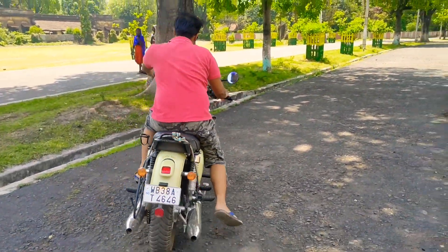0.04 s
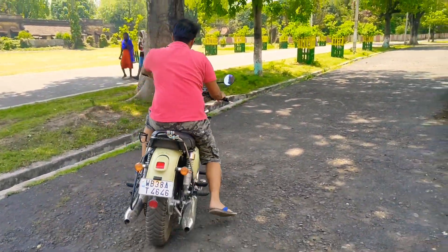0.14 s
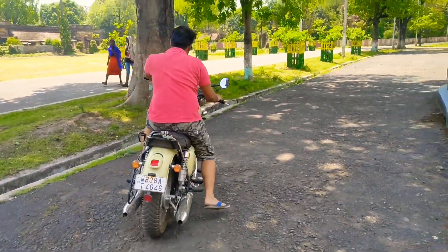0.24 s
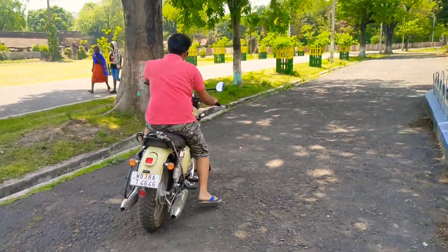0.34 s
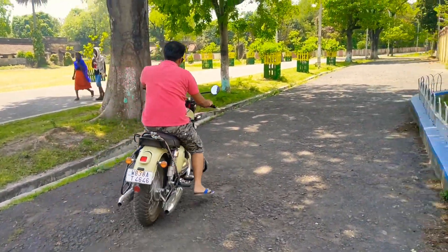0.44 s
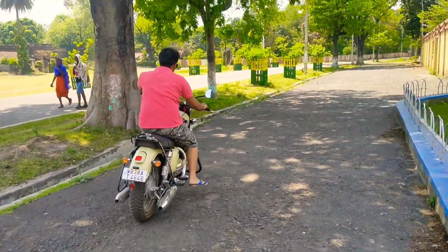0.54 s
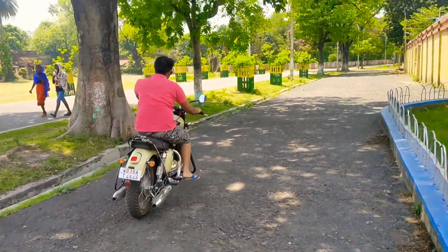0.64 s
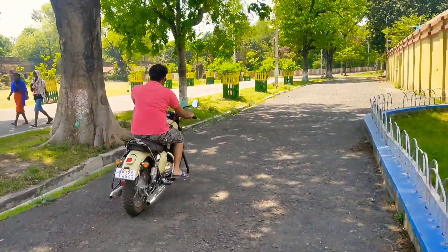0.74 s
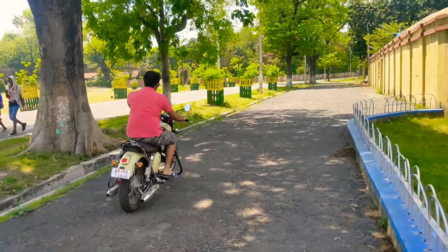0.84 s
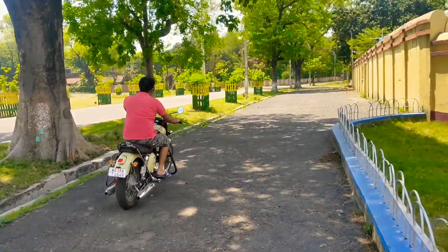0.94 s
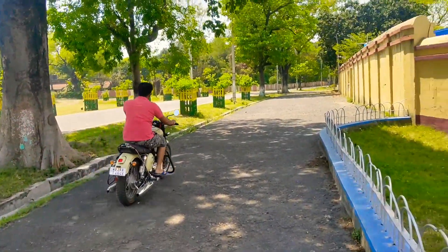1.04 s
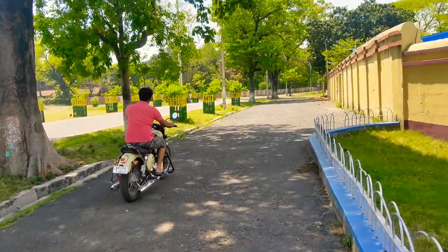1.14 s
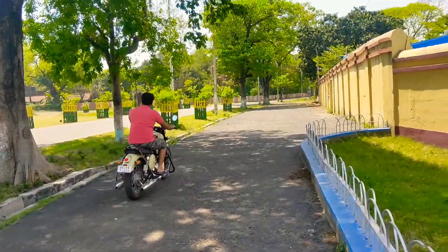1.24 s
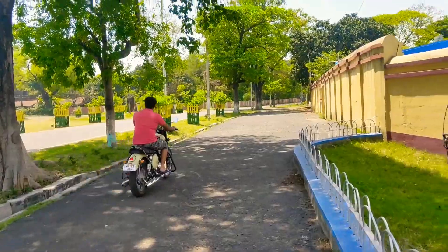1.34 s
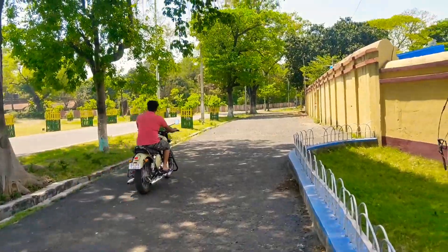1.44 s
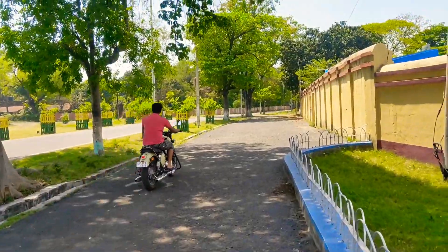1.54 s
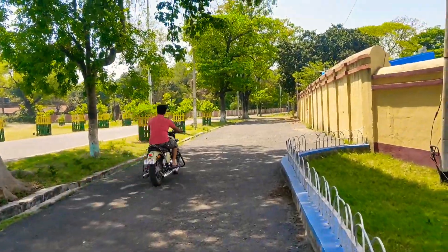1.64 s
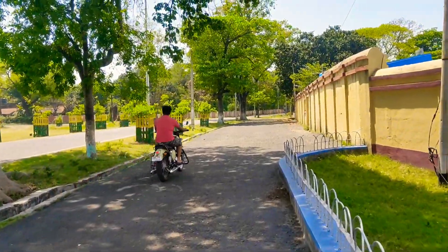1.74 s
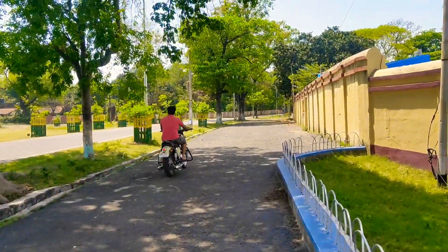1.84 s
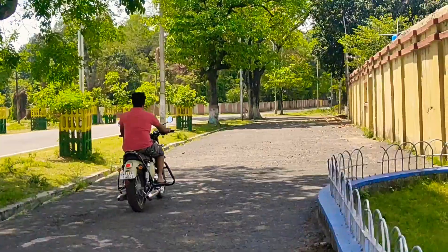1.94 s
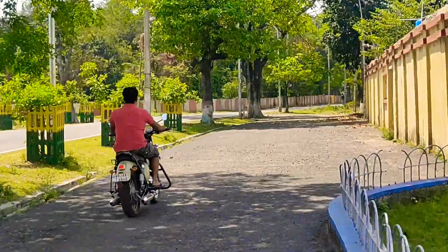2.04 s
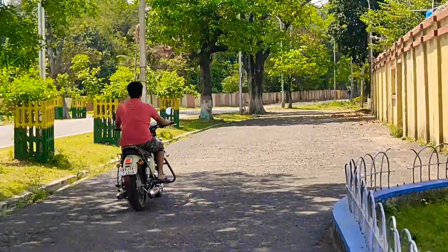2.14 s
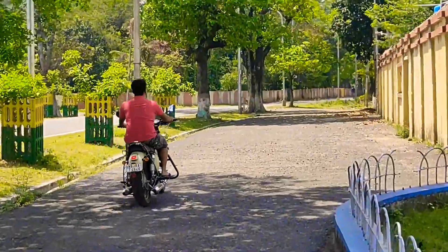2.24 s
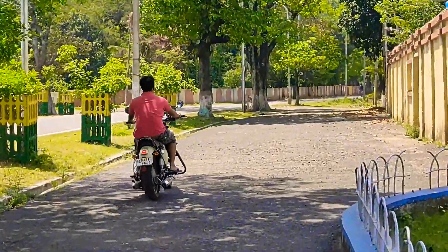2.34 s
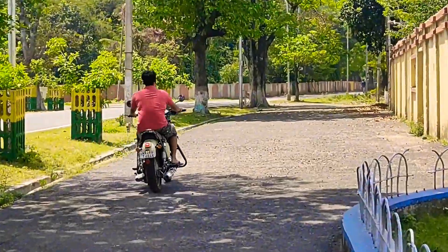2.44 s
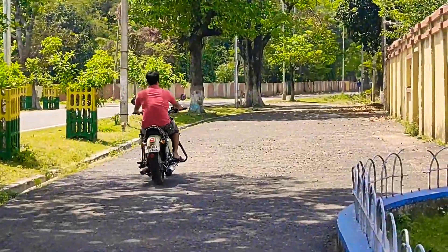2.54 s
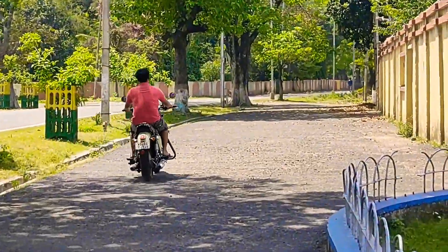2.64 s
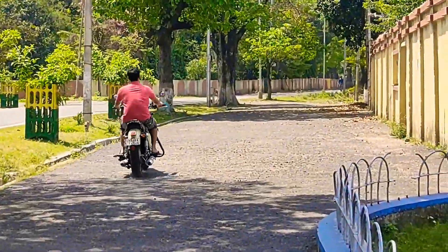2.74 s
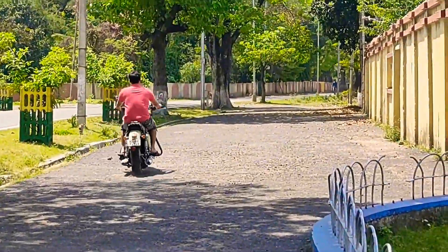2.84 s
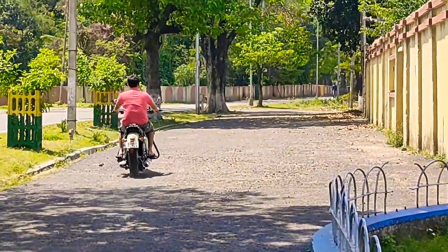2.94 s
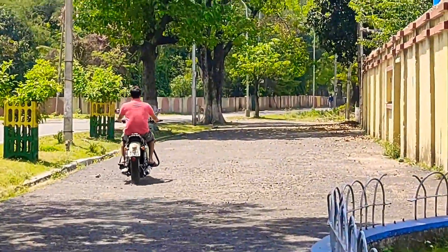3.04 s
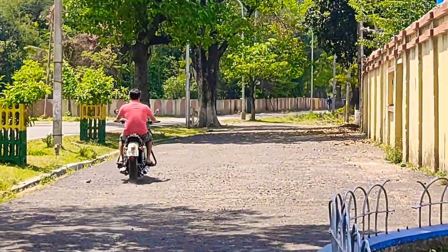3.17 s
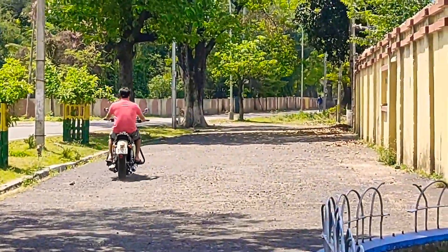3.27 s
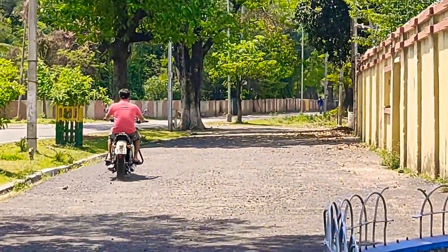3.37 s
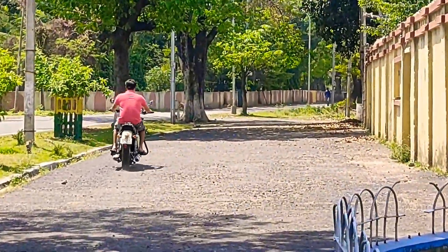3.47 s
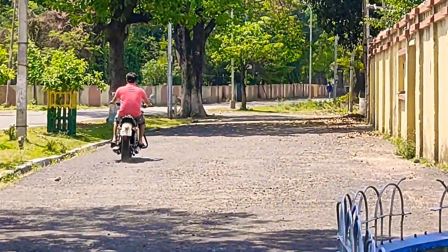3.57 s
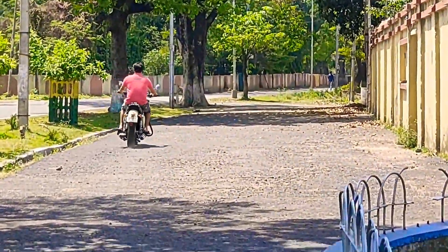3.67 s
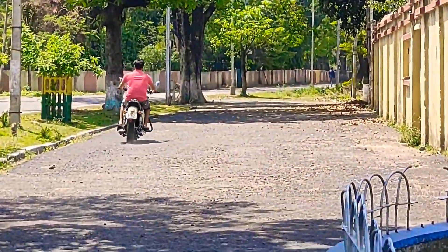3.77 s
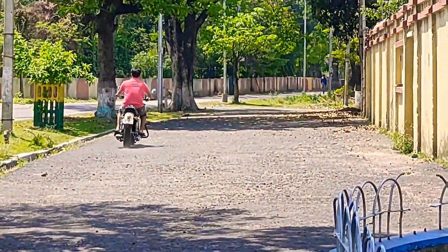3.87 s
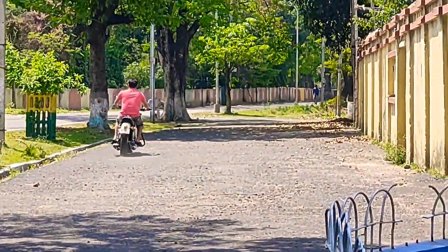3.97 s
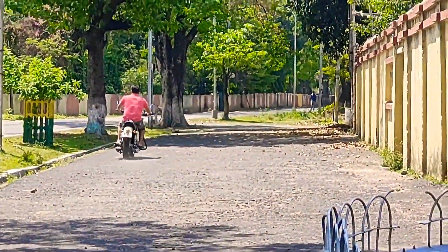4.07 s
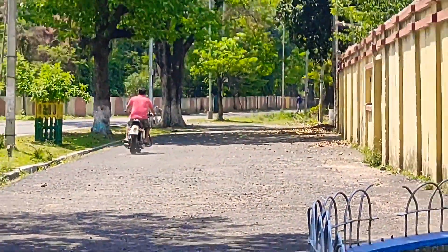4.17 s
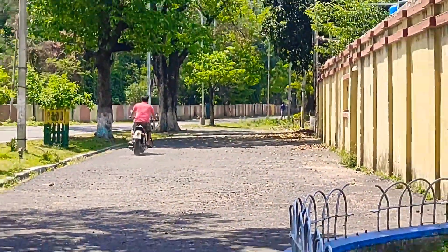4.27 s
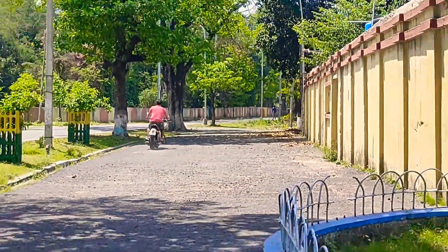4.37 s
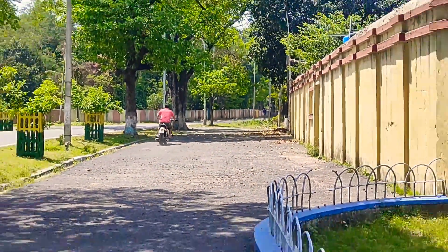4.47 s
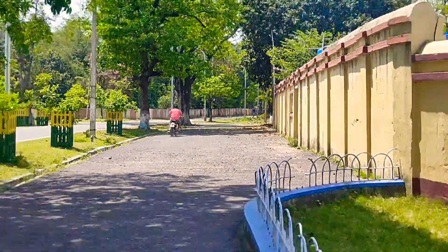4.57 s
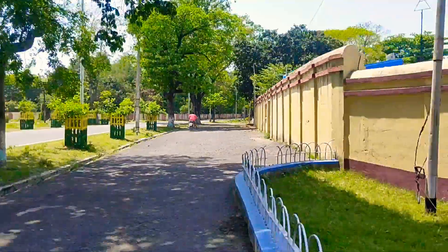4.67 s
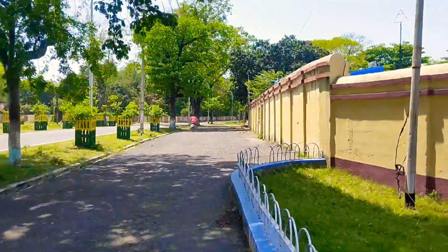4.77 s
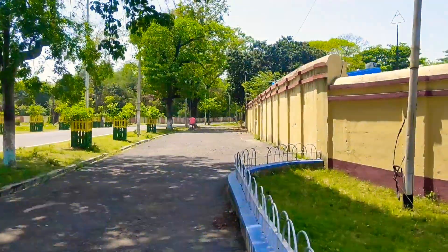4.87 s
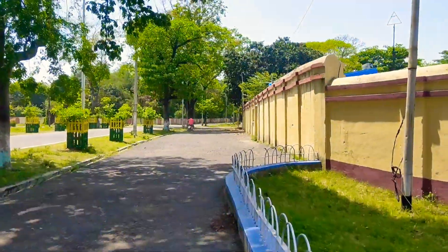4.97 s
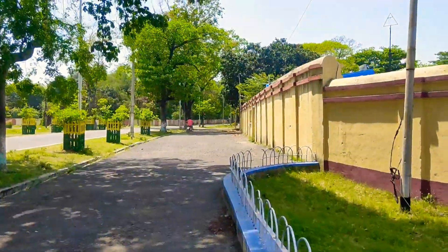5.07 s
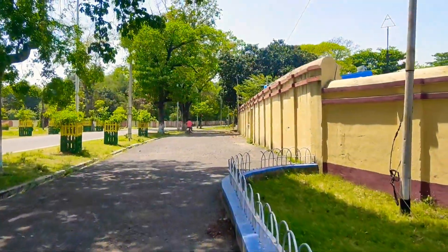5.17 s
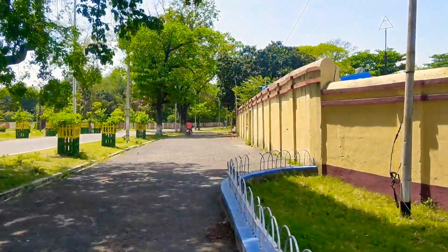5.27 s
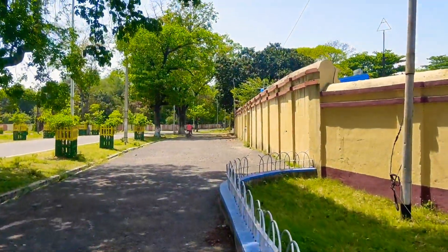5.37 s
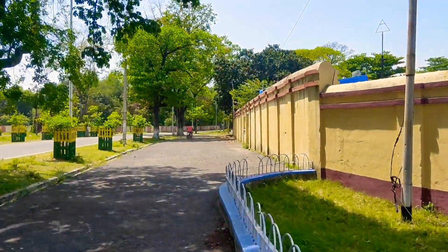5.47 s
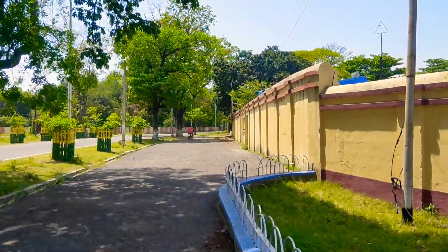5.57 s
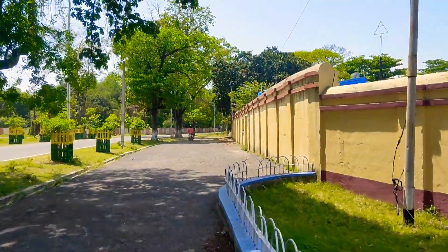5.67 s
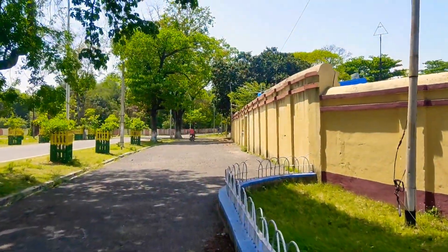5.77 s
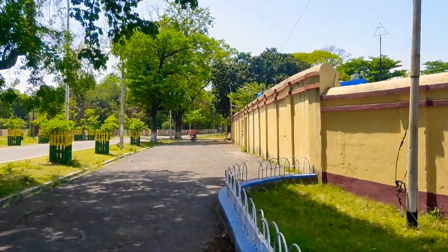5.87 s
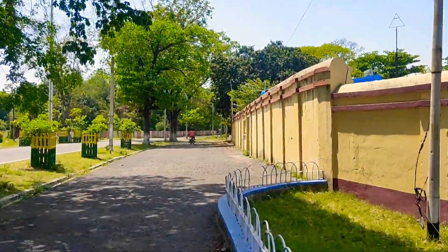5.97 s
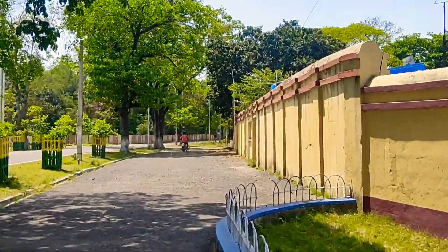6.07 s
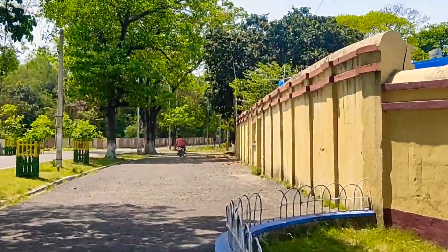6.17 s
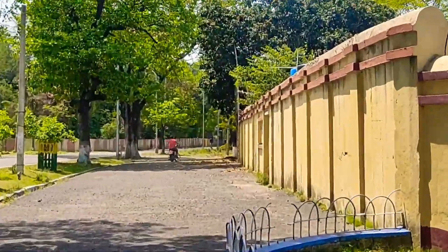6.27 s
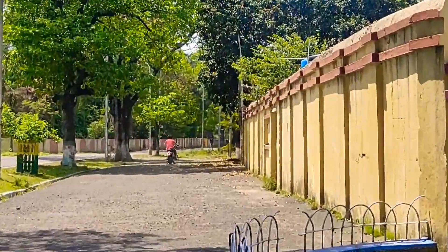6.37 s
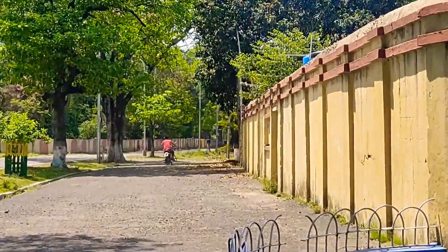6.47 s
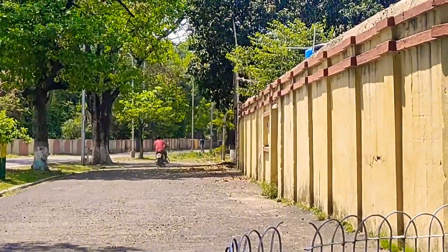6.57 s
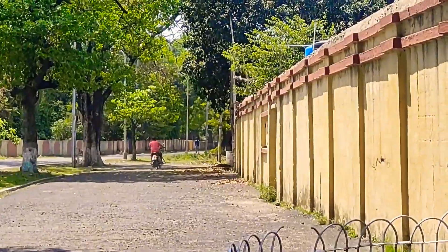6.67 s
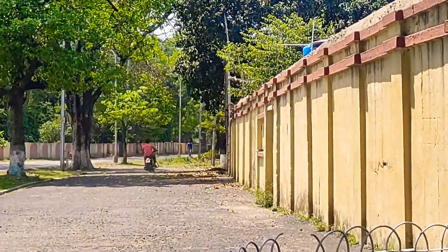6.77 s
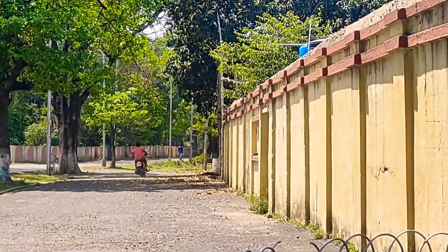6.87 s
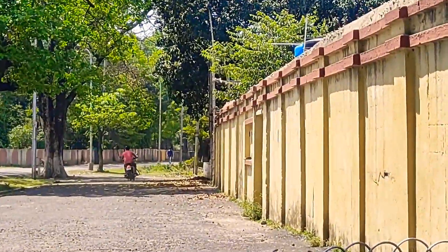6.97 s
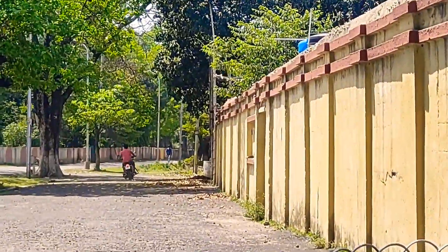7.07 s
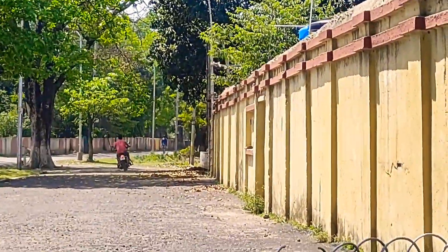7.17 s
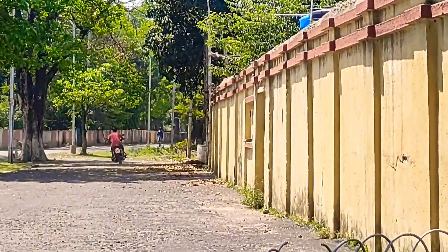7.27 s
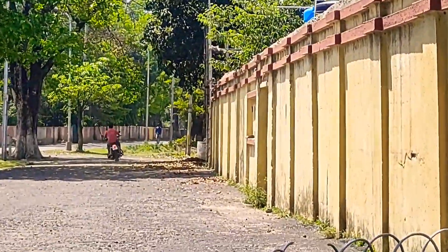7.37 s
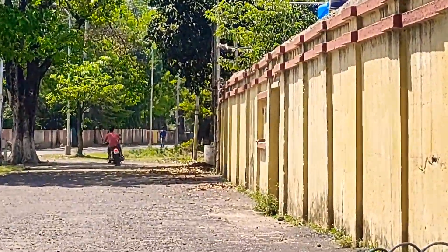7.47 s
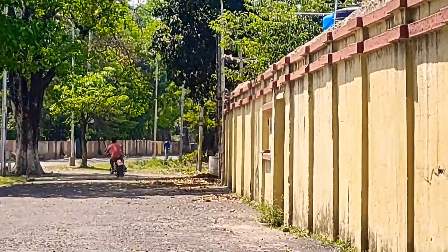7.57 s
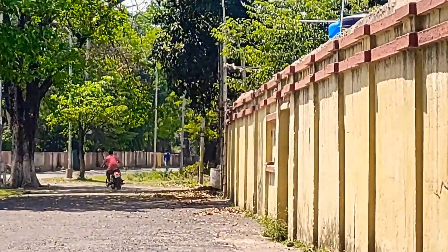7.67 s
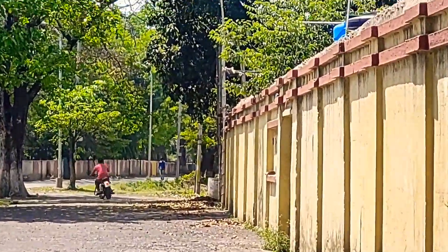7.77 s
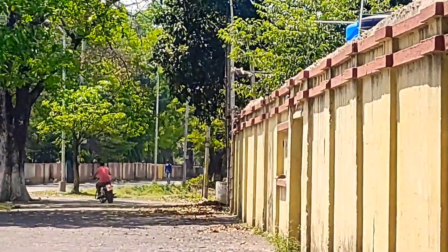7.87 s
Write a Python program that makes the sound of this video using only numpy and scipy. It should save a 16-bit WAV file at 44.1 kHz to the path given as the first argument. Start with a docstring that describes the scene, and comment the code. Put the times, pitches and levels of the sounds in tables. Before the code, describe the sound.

A single-cylinder motorcycle pulls away with loud thumping exhaust, changes gear twice, fades down a walled lane; rustling and snaps close on the left.

```python
"""Motorcycle leaving down a walled lane

A single-cylinder motorcycle pulls away, changes gear twice and coasts off with uneven pops. Each firing rings
the exhaust pipes, returns off a wall and puffs hiss; the engine clatters. Wind stirs the two microphone ports,
something rustles and ticks close on the left, a thin high chirp sounds about once a second, far noise is faint."""
import sys
import numpy as np
from scipy import signal
from scipy.fft import rfft, irfft, next_fast_len
from scipy.io import wavfile
from scipy.ndimage import uniform_filter1d, map_coordinates

SR = 44100
rng = np.random.default_rng(int(sys.argv[2]) if len(sys.argv) > 2 else 0)


def to_wav(s):
    """Save 16-bit WAV."""
    ch = np.atleast_2d(s).T  # columns
    pcm = np.round(np.clip(ch, -1, 1) * 32767)  # PCM
    wavfile.write(sys.argv[1], SR, pcm.astype(np.int16))


def level_to_linear(level):
    """Convert decibel levels to linear amplitude factors, elementwise."""
    exponent = np.asarray(level, float) / 20
    return 10 ** exponent


N = 349097

# Noise colours, scaled to rms 1 in use. Each row: frequency in Hz, relative density in dB per Hz.
FAR_COLOUR = [(880, -38), (1000, 1), (1130, -4), (1280, -14), (1420, -43)]
WIND_COLOUR = [(15, -14), (30, -3), (55, -1), (90, -1), (125, -8), (170, -30), (250, -90)]
RUSTLE_COLOUR = [(880, -48), (1600, -19), (1900, -2), (2250, -2), (2600, 3.5), (3040, 3.5), (4240, -14),
                 (5820, 1.5), (10900, -31.5), (12100, -52.5), (13000, -31)]
RUMBLE_COLOUR = [(40, -54), (80, -33), (120, 9), (180, 8), (260, 3.5), (320, 8.5), (450, -51), (700, -80)]
DRONE_COLOUR = [(250, -49), (350, -7.5), (450, -6), (540, -1), (640, -5), (750, -7.5), (950, -19),
                (1200, -70)]
SHELL_COLOUR = [(600, -18), (700, -2.5), (785, 4), (850, -4.5), (930, -71)]
CLATTER_COLOUR = [(530, -36), (900, 1.5), (1130, -3.5), (1280, -7), (1350, 4.5), (1560, -0.5), (1710, 3),
                  (1940, -4), (2490, 2.5), (2700, -3.5), (3000, -3.5), (3280, -5.5), (3640, -13),
                  (4000, -11.5), (5200, -11.5), (8800, -120)]
HISS_COLOUR = [(2060, -24), (3500, -10.5), (3920, -4), (4660, -2.5), (5990, 6.5), (6700, -0.5),
               (8030, -17.5), (11000, -20.5), (12600, -28), (14900, -3.5), (15600, -42)]
CHIRP_COLOUR = [(11400, -52), (11800, 8), (12400, 5), (12800, -37)]
SNAP_TOP_COLOUR = [(7000, -36), (9000, 9), (15500, -11)]
TAPS_COLOUR = [(600, -49), (1000, 3.0), (3600, -0.5), (5500, -40), (8000, -95)]
# Filters that colour the ticks. Each row: frequency in Hz, gain in dB.
TICK_COLOUR = [(1300, -42.0), (1900, 4.0), (2500, 2), (3500, 1.5), (4500, -15), (7000, -5.5), (9000, -18),
               (11000, -48)]
TICK_TOP_COLOUR = [(7000, -40), (9000, 4), (15500, 8)]

# Wind at the ports, before its lumps. Each row: time in seconds, level in dB.
WIND = [(0, -54), (.6, -43), (.8, -28), (1, -31.5), (1.2, -42), (1.54, -28), (1.75, -40), (2.03, -24),
        (2.2, -34), (2.35, -25.5), (2.6, -34), (2.95, -23.5), (3.22, -35.5), (3.44, -29), (3.85, -38),
        (4.5, -47), (4.72, -34), (5, -36), (5.24, -35.5), (5.45, -36.5), (5.9, -38.5), (6.2, -33.5),
        (6.55, -45), (6.85, -35), (7.12, -40), (7.4, -41.5), (7.92, -54)]
# High chirps. Each row: start in seconds, time to fall 26 dB in seconds, level in dB before flutter and panning.
CHIRPS = [(3.665, 0.081, -58), (4.66, 0.097, -51), (5.64, 0.33, -58.5), (6.63, 0.12, -55),
          (7.657, 0.16, -60)]
# Dry ticks nearby. Each row: start in seconds, relative level in dB, left over right in dB,
# relative level of the top octave in dB.
TICKS = [(4.958, -36, 10, -13), (5.23, -34, 12, -34), (5.3553, -23.5, 12, -30), (5.372, -31, 14, -26)]
# Snaps in the rustle. Each row: start in seconds, relative level in dB, 60 dB decay time in seconds,
# opening crack over the snap in dB, lower band over the upper in dB.
SNAPS = [(6.1882, -35, 0.11, 2, -5), (6.214, -31, 0.17, 4, -1), (6.48, -44, 0.11, -2, -2),
         (6.6162, -34, 0.19, 13, -14), (6.652, -36, 0.093, 12, -1), (6.674, -38.5, 0.087, 19, -2),
         (6.687, -47, .04, 4, 5), (6.7895, -54, 0.044, 8, -12), (6.8631, -47, 0.11, -2, 6),
         (7.0248, -60, 0.043, -2, -8), (7.0484, -33.5, 0.05, 7, -1.5), (7.0936, -44, 0.094, 8, -8),
         (7.118, -41, 0.1, 10, 5.5), (7.2263, -49, .08, 2, -11), (7.28, -45, 0.083, -6, 0),
         (7.3136, -37, 0.19, 7, -8), (7.345, -50, .06, 3, 0), (7.41, -36, 0.082, -6, -6),
         (7.4777, -39, 0.089, -2, -4), (7.488, -45, 0.099, 6, 2), (7.582, -52, 0.072, 2, -8),
         (7.6085, -37, 0.3, 9, -13), (7.625, -42, 0.17, 0, -6), (7.66, -40, 0.2, -6, -5),
         (7.734, -27.5, 0.091, 4, -5), (7.79, -39, .15, -9, -1), (7.8147, -35, 0.21, -9, -2),
         (7.828, -41, 0.16, -3, -7), (7.842, -46, 0.17, 3, -5)]
# Engine speed as heard. Each row: time in seconds, firings a second.
SPEED = [(0.0, 25.31), (0.415, 23.22), (0.71, 27.3), (1.04, 25.91), (1.455, 28.66), (2.165, 28.95),
         (2.505, 31.69), (3.58, 39.0), (3.835, 39.26), (4.0, 35.83), (4.23, 37.9), (4.98, 34.5),
         (5.05, 34.7), (5.19, 37.8), (5.28, 38.4), (5.38, 34.7), (5.48, 33.7), (5.53, 28.3), (5.61, 30.8),
         (5.73, 32.64), (6.21, 30.89), (6.625, 28.35), (7.0, 22.49)]
# Gear changes, in which firings lose their beat. Each row: start in seconds, length in seconds.
GEARS = [(3.95, .29), (5.09, .38)]
# Scattered rumble, before its lumps. Each row: time in seconds, level in dB.
RUMBLE = [(0, -28), (.5, -33), (1.4, -36), (2.2, -38), (2.7, -34), (3.3, -38), (3.7, -43), (4.1, -42),
          (4.4, -51), (5.1, -48), (5.32, -41), (5.7, -51), (6.4, -55), (6.85, -50), (7.2, -54), (7.5, -53),
          (7.92, -60)]
# Engine noise, before it swells with the firings. Each row: time in seconds, drone in dB,
# silencer shell in dB, clatter in dB.
ENGINE = [(0, -37.5, -30.5, -26.5), (.5, -39, -32.5, -28), (.9, -37, -39.5, -28.5),
          (1.4, -34.5, -45, -30.5), (2.1, -35.5, -38.5, -31), (3.7, -37, -39.5, -33.5),
          (3.95, -44.5, -40.5, -37), (4.7, -44.5, -46.5, -40.5), (5.7, -47.5, -54, -45.5),
          (6.4, -52.5, -47.5, -48.5), (6.7, -58, -51, -51), (7, -60, -60, -55.5), (7.17, -66, -63.5, -55),
          (7.4, -91, -56.5, -62), (7.55, -85, -65, -68), (7.78, -95, -72, -75), (7.82, -91, -57, -55),
          (7.92, -87, -72, -61)]
# Ringing engine cases. Each row: frequency in Hz, width in Hz, relative gain in dB.
CASES = [(1070, 18, -15.5), (1320, 146, 2.5), (1561, 57, 3.5), (1896, 300, 2.5), (2275, 240, -10),
         (2660, 84, 4), (3217, 33, -3)]
# Rasp that climbs as the throttle opens. Each row: time in seconds, centre in Hz, level in dB before swelling.
SURGE = [(.3, 1400, -55), (.55, 1200, -41), (.65, 1250, -36), (.8, 1420, -28.5), (.9, 1530, -32),
         (.95, 1330, -34), (1.1, 1330, -40), (1.25, 1380, -32), (1.45, 1440, -38), (2.1, 1400, -44),
         (2.4, 1520, -35), (2.7, 1500, -53), (3.3, 1540, -42), (3.9, 1540, -50), (4.2, 1500, -73)]
# Level of each pipe mode as the pipes turn away, load changes and distance grows.
# Each row: time in seconds, boom in dB, body in dB, throat in dB, ring in dB.
EXHAUST = [(0, -11.5, -13.5, -35, -19.5), (.84, -24, -18, -21.5, -23.5), (.93, -24, -20, -22.5, -32.5),
           (1.6, -24.5, -27.5, -23, -24.5), (2.2, -32.5, -24, -31, -26.5), (2.6, -57, -34.5, -26.5, -29.5),
           (3.1, -68, -28.5, -36.5, -27), (3.5, -43, -44, -48, -26), (3.93, -52, -55, -80, -29),
           (4.02, -32, -39, -45, -40), (4.3, -46, -40, -52, -34.5), (4.6, -37, -36, -67, -40),
           (5.05, -30, -54, -62, -43.5), (5.15, -60, -46, -64, -41), (5.45, -59, -50, -44, -43),
           (5.55, -34, -60, -74, -48), (6.2, -35, -48, -77, -54), (6.5, -36.5, -40.5, -63, -42.5),
           (6.9, -37.5, -47, -60, -45), (7.3, -49.5, -44.5, -82, -51), (7.92, -50, -55.5, -90, -100)]
# Pipe modes: boom, body, throat and ring. Each row: frequency in Hz, width in Hz.
PIPE = [(113, 34), (156, 38), (205, 49), (260, 44.6)]
# The loud ones of the uneven firings while coasting. Each row: time in seconds, dB over a regular firing.
POPS = [(7.017, -2), (7.107, 9), (7.172, 2), (7.195, -6), (7.233, -5), (7.284, 4.5), (7.498, 0),
        (7.548, 4.5), (7.627, 0), (7.696, 1), (7.732, -1), (7.779, 4), (7.858, 1.5)]
# Weaker tones tied to the firings. Each row: time in seconds, upper pipe mode in dB, overtones in dB,
# low tone at twice the firing rate in dB.
FRINGE = [(0, -37, -55, -30), (.7, -26.5, -46, -27), (1.3, -31, -58, -42), (1.7, -38, -54, -40),
          (2.2, -44, -56, -32), (2.6, -37.5, -53, -45), (3, -35, -47, -46), (3.6, -37, -39.5, -33),
          (3.95, -49.5, -51, -35), (4.4, -40.5, -50, -38), (4.75, -48, -67, -37), (5.1, -51.5, -62, -71),
          (5.5, -61, -49, -52), (6.1, -49.5, -61, -73), (6.9, -90, -71, -59), (7.92, -90, -95, -90)]
# Resonances of the overtones, passed twice. Each row: frequency in Hz, width in Hz, gain of one pass in dB.
OVERTONES = [(407, 43, -2), (565, 120, 0.5), (693, 120, 3)]
# Difference between the ports for the motorcycle. Each row: frequency in Hz, left over right in dB.
PORTS = [(60, 4.5), (110, -0.5), (200, 0.5), (380, 1), (700, 1), (1290, 2), (2380, 5.5), (4400, 2.5),
         (8120, -4), (15000, 5)]
# Delay of the left port behind the right. Each row: frequency in Hz, lag in samples.
LEFT_LAG = [(250, 11), (700, 5), (1300, 8), (1700, 11)]

FAR_DB = -67.5  # before its wobble
RUSTLE_S, RUSTLE_RISE_S, RUSTLE_DB = 5.54, 0.7, -55.5  # start, fade-in, level before grain and panning
SNAP_RISE = 0.02  # attack time constant as a share of the decay time
SNAP_GRAIN_DB, SNAP_LEFT_DB = 3.5, 12  # roughness of the decay; whole rustle, left over right
SNAP_TOP_DB = -48  # added top octave, relative to the snap
CRACK_T60_S, CLICK_DB = .011, -4  # decay of the opening crack; trim of the dry click that starts it
TICK_TAIL_DB, TICK_T60_S = -17.5, 0.025  # a short scratchy tail
FIRST_FIRING_S = .0074
# round the far bend sounds lose their upper part: start, time to complete, corners of the two steps
BEND_S, BEND_SPAN_S, BEND_HZ = 6.45, 1.05, (325, 225)
# close by, the noise comes in puffs with the firings: share at the start 0-1, time in which it halves
PUFFED, PUFF_HALF_S = 0.77, 1.7
STROKE_SCATTER_DB = 1.5  # strength from firing to firing
# bursts in each cycle: cycles ahead of the exhaust beat, rise in cycles, decay in cycles
KNOCK, PUFF = (.2, .06, .09), (.012, .03, .13)
# every firing knocks the silencer shell: mode and width, cycles ahead of the beat, dB over the shell's noise
SHELL_HZ, SHELL_WIDTH_HZ, SHELL_LEAD, SHELL_KNOCK_DB = 790, 70, .13, -3
TAPS_BEAT = .12  # share of the valve taps that falls on the beat, at any distance
SURGE_WIDTH_HZ = 110
HISS_DB, HISS_LOSS_DB_PER_S = -28.5, 5  # level at the start before puffing; the hiss thins with distance
TOP_DB, TOP_S, TOP_LOSS_DB_PER_S2 = 7.5, 2.34, 1  # hiss above 7.5 kHz: largest lift, when, fall to either side
STEADY_MS_PER_S, STUMBLE_MS = .03, .9  # timing scatter: growth with distance, extra while changing gear
FAINT_POPS, FAINT_POP_DB = 8, -7  # weak ones at random while coasting: count, dB over a regular firing
# the sharp edge of each firing wears off: halving time, share that stays 0-1
EDGE_HALF_S, EDGE_LEFT = 0.71, 0.034
RASP_HZ, RASP_WIDTH_HZ = 370.4, 92  # upper pipe mode
# the wall's answer is strongest while the bike runs alongside: middle, time to either side for 30 dB less,
# level under the direct sound
WALL_S, WALL_SPAN_S, WALL_DB = 2.3, 1.36, -10
# its lag shrinks steadily: lag at the middle, rate, least lag
WALL_LAG_MS, WALL_CLOSING_MS_PER_S, WALL_LEAST_MS = 14.8, 16, 4


def unit(x):
    """Scaled to rms 1."""
    return x / np.sqrt(np.mean(x ** 2) + 1e-20)


def along(points, hz):
    """(Hz, value) points read on a log axis."""
    f, v = np.transpose(points)
    return np.interp(np.log(hz + 1), np.log(f + 1), v)


def curves(rows):
    """One value per sample for each column after the time."""
    s, *cols = np.transpose(rows)
    return [np.interp(np.arange(N) / SR, s, c) for c in cols]


def wobble(rate):
    """A smooth random curve, rate knots a second."""
    return map_coordinates(rng.standard_normal(int(N * rate / SR) + 4), [np.arange(N) * rate / SR])


def filtered(x, response):
    """x times a complex response of frequency."""
    m = next_fast_len(N + 8192)
    return irfft(rfft(x, m) * response(np.fft.rfftfreq(m, 1 / SR)), m)[..., :N]


def lower_part(x, corner_hz, order=12):
    """What lies below a corner, without phase shift."""
    return filtered(x, lambda f: 1 / (1 + (f / corner_hz) ** order))


def resonance(f, centre_hz, width_hz):
    """Response of one damped mode, 1 at its centre."""
    return 1j * f * width_hz / (centre_hz ** 2 - f * f + 1j * f * width_hz)


def resonances(f, modes):
    """Several damped modes side by side, each with its gain."""
    return sum(level_to_linear(db) * resonance(f, centre_hz, width_hz) for centre_hz, width_hz, db in modes)


def rush(colour, alike, patchy_db=0):
    """Stereo noise of rms 1; alike is the share of power common to both ports; narrow, brief patches stand out."""
    common, *own = rng.standard_normal((3, N))
    pair = np.sqrt(alike) * common + np.sqrt(1 - alike) * np.array(own)
    if patchy_db:
        z = signal.stft(pair, nperseg=512)[2]
        field = uniform_filter1d(rng.standard_normal(z.shape[1:]), size=3, axis=0)
        field = uniform_filter1d(field, size=6, axis=1)
        pair = signal.istft(z * level_to_linear(patchy_db * unit(field)), nperseg=512)[1][:, :N]
    return unit(filtered(pair, lambda hz: level_to_linear(along(colour, hz))))


def distance():
    """A faint, patchy band of far-off noise."""
    return level_to_linear(FAR_DB + 3.8 * wobble(6.9)) * rush(FAR_COLOUR, 0.33, patchy_db=4)


def wind():
    """Lumpy low buffeting at the microphone, partly different at each port."""
    return level_to_linear(curves(WIND)[0] + 3.2 * wobble(12) + 4.1 * wobble(22)) * rush(WIND_COLOUR, 0.17)


def chirps():
    """A thin fluttering noise band near the top of hearing; each chirp starts at once and dies away."""
    t = np.arange(N) / SR
    level = sum(level_to_linear(db) * (t > s) * np.exp(-3 * np.clip(t - s, 0, 9) / length) for s, length, db in CHIRPS)
    flutter = level_to_linear(4 * wobble(70))
    return level * flutter * rush(CHIRP_COLOUR, 0.41) * level_to_linear([[3], [-6]])


def ticks():
    """Single sharp, broad clicks close on the left: a filtered impulse with a scratchy noise tail."""
    body, bright = np.zeros((2, 2, N))
    t = np.arange(SR // 30) / SR
    for s, db, pan_db, bright_db in TICKS:
        start = round(s * SR)
        sides = level_to_linear(db + np.array([pan_db / 3, -pan_db * 2 / 3]))
        tail = level_to_linear(TICK_TAIL_DB - 60 * t / TICK_T60_S) * rng.standard_normal((2, len(t)))
        tail[:, 0] = 1  # the impulse itself
        body[:, start:start + len(t)] += level_to_linear(18.0) * sides[:, None] * tail
        bright[:, start] = level_to_linear(bright_db + 22) * sides
    body = filtered(body, lambda hz: level_to_linear(along(TICK_COLOUR, hz)))
    return body + filtered(bright, lambda hz: level_to_linear(along(TICK_TOP_COLOUR, hz)))


def rustle():
    """Grainy scuffing with sharp snaps, close to the left port; each snap opens with a crack and crumbles away."""
    begun = np.clip((np.arange(N) / SR - RUSTLE_S) / RUSTLE_RISE_S, 0, 1)
    grain = level_to_linear(3 * wobble(40) + 2.5 * wobble(250))
    level = begun * grain * level_to_linear(RUSTLE_DB) * level_to_linear([[0], [-2]])  # upper band, lower band
    bright, clicks = np.zeros((2, N))
    crumble = level_to_linear(SNAP_GRAIN_DB * wobble(300))
    t = np.arange(SR // 3) / SR
    for s, db, t60, crack_db, lower_db in SNAPS:
        start = round(s * SR)
        burst = level_to_linear(-60 * t / t60) * (1 - np.exp(-t / (SNAP_RISE * t60))) * crumble[:len(t)]
        crack = level_to_linear(crack_db - 60 * t / CRACK_T60_S) * (1 - np.exp(-t * 3000))
        burst = level_to_linear(db - 9.0) * (burst + crack)
        level[:, start:start + len(t)] += (burst * level_to_linear([[0], [lower_db]]))[:, :N - start]
        bright[start:start + len(t)] += level_to_linear(SNAP_TOP_DB) * burst[:N - start]
        clicks[start + 20] = level_to_linear(db - 14.0 + crack_db + CLICK_DB)
        crumble = np.roll(crumble, len(t))  # another stretch for the next snap
    scuff = rush(RUSTLE_COLOUR, 0.049, patchy_db=1)
    lower = lower_part(scuff, 4200)
    both = level[0] * (scuff - lower) + level[1] * lower + bright * rush(SNAP_TOP_COLOUR, .3)
    colour = lambda hz: level_to_linear(along(RUSTLE_COLOUR, hz))
    both += filtered(clicks, colour) / np.mean(colour(np.linspace(0, SR / 2))) * 2
    return both * level_to_linear([[SNAP_LEFT_DB / 3], [-SNAP_LEFT_DB * 2 / 3]])


def crank():
    """Firing cycles counted since the first one: the running sum of the engine speed."""
    cycles = np.cumsum(curves(SPEED)[0]) / SR
    return cycles - cycles[round(FIRST_FIRING_S * SR)]


def receding(x):
    """x fading over into its low part in two steps, round the far bend."""
    gone = (np.arange(N) / SR - BEND_S) / BEND_SPAN_S * len(BEND_HZ)
    for k, corner_hz in enumerate(BEND_HZ):
        share = np.clip(gone - k, 0, 1)
        x = (1 - share) * x + share * lower_part(x, corner_hz, order=8)
    return x


def swell(cycles, strength, share, burst):
    """Gain with a burst once a cycle, each of its own strength, over a steady part."""
    lead, rise, decay = burst
    turn, number = np.modf(cycles + 1 + lead)
    shape = unit((1 - np.exp(-turn / rise)) ** 2 * np.exp(-turn / decay))
    return 1 - share + share * strength[number.astype(int)] * shape


def rumble():
    """The exhaust smeared by trees and walls: lumpy low noise, nearly alike at both ports."""
    return level_to_linear(curves(RUMBLE)[0] + 2.5 * wobble(15)) * receding(rush(RUMBLE_COLOUR, 0.96))


def drone(level_db, bark):
    """Low engine noise swelling with combustion; past the bend its lowest part goes first."""
    noise = level_to_linear(level_db + 0.26 * wobble(25)) * bark * rush(DRONE_COLOUR, .9)
    lost = np.clip((np.arange(N) / SR - BEND_S) / BEND_SPAN_S * 3, 0, .6)
    return noise - lost * lower_part(noise, 480)


def shell(level_db, cycles, strength, bark, near):
    """The silencer shell: a noise band, and a mode struck by each firing that fades with distance."""
    noise = level_to_linear(level_db + 2.9 * wobble(9)) * bark * rush(SHELL_COLOUR, .9)
    number = np.floor(cycles + 1 + SHELL_LEAD).astype(int)
    knocks = np.diff(number, prepend=number[0]) * strength[number]
    struck = unit(filtered(knocks, lambda f: -resonance(f, SHELL_HZ, SHELL_WIDTH_HZ) ** 2))
    return noise + level_to_linear(level_db + SHELL_KNOCK_DB) * near * struck


def surge():
    """A narrow band of noise gliding with the throttle, partly different at each port."""
    centre_hz, level_db = curves(SURGE)
    common, *own = lower_part(rng.standard_normal((3, 2, N)), SURGE_WIDTH_HZ / 2, order=4)
    turn = 2 * np.pi * np.cumsum(centre_hz) / SR
    # slow noise on two carriers a quarter turn apart makes a band round the centre
    pair = [(common[0] + a) * np.cos(turn) + (common[1] + b) * np.sin(turn) for a, b in own]
    return level_to_linear(level_db) * unit(np.array(pair))


def clatter(level_db, cycles, strength, bark, puffed):
    """Mechanical noise and valve taps ringing the engine cases, with the throttle's rasp."""
    taps = swell(cycles, strength[:, 0], TAPS_BEAT, KNOCK) * level_to_linear(0.99 * wobble(150)) * rush(TAPS_COLOUR, .5)
    cases = unit(filtered(taps, lambda f: resonances(f, CASES)))
    noise = 0.68 * rush(CLATTER_COLOUR, .5, patchy_db=3) + 0.76 * cases
    beat = bark + swell(cycles, strength[:, 1], 0.21 * puffed, PUFF) - 1
    return (level_to_linear(level_db + 0.39 * wobble(30)) * noise + surge()) * beat


def hiss(cycles, strength, puffed):
    """Gas noise puffing with each firing, thinning with distance; its treble rises, then falls."""
    t = np.arange(N) / SR
    puffs = swell(cycles, strength[:, 1], puffed, PUFF)
    puffs = puffs + 0.14 * puffed * swell(cycles, strength[:, 0], 1, KNOCK)
    noise = level_to_linear(HISS_DB - HISS_LOSS_DB_PER_S * t) * puffs * rush(HISS_COLOUR, .3, patchy_db=2.5)
    treble = filtered(noise, lambda f: 1 / (1 + (7500 / (f + 1)) ** 12))
    return noise + (level_to_linear(TOP_DB - TOP_LOSS_DB_PER_S2 * (t - TOP_S) ** 2) - 1) * treble


def engine(cycles):
    """Drone, shell, clatter and hiss swell with each firing, less so with distance, over the rumble."""
    near = .5 ** (np.arange(N) / SR / PUFF_HALF_S)
    puffed = PUFFED * near
    # columns: knock, puff
    strength = level_to_linear(STROKE_SCATTER_DB * rng.standard_normal((int(cycles[-1]) + 3, 2)))
    # combustion is heard before the gas leaves the pipes
    bark = swell(cycles, strength[:, 0], 0.24 * puffed, KNOCK)
    drone_db, shell_db, clatter_db = curves(ENGINE)
    noise = drone(drone_db, bark) + shell(shell_db, cycles, strength[:, 0], bark, near)
    noise = noise + clatter(clatter_db, cycles, strength, bark, puffed)
    return noise + hiss(cycles, strength, puffed) + rumble()


def ring(blows, mode):
    """Blows through one pipe mode; the gas slug is a soft hump, and part turns back once inside the silencer."""
    def slug(f):
        hump = np.exp(-.5 * (f / 255) ** 2)
        turned_back = level_to_linear(-14.0) * np.exp(-2j * np.pi * f * 0.00911)  # 9.11 ms late
        return hump * (1 + turned_back) * f ** 6 / (f ** 6 + 90 ** 6)

    return filtered(blows, lambda f: slug(f) * resonance(f, *mode))


def firings(cycles):
    """Sample and relative dB of each blow: one a cycle under power, uneven pops on the overrun."""
    t = np.arange(N) / SR
    pop_s, pop_db = np.transpose(POPS)
    at = np.flatnonzero(np.diff(np.floor(cycles))) + 1
    at = at[at < pop_s[0] * SR - SR // 50]
    changing = sum((t > s) & (t < s + length) for s, length in GEARS)
    scatter_ms = STEADY_MS_PER_S * t + STUMBLE_MS * changing
    at += np.round(scatter_ms[at] * SR / 1000 * rng.standard_normal(len(at))).astype(int)
    faint = rng.integers(pop_s[0] * SR, N, FAINT_POPS)
    size_db = np.r_[np.zeros(len(at)), pop_db, np.full(FAINT_POPS, FAINT_POP_DB)]
    return np.r_[at, np.round(pop_s * SR).astype(int), faint], size_db


def wall(pipe):
    """The exhaust returned off a wall, its lag closing in."""
    from_middle = np.arange(N) / SR - WALL_S
    lag_ms = np.maximum(WALL_LAG_MS - WALL_CLOSING_MS_PER_S * from_middle, WALL_LEAST_MS)
    echo_db = WALL_DB - 30 * (from_middle / WALL_SPAN_S) ** 4
    return level_to_linear(echo_db) * np.interp(np.arange(N) - lag_ms * SR / 1000, np.arange(N), pipe)


def exhaust(cycles):
    """Slugs of gas ring the pipe modes and overtones, with the wall's echo and a low throb under power."""
    t = np.arange(N) / SR
    at, size_db = firings(cycles)
    scatter_db = .7 * rng.standard_normal((len(at), len(PIPE)))
    even = np.zeros(N)  # all blows alike, for scaling and for the weaker tones
    even[at] = 1
    pipe = np.zeros(N)
    for k, level_db in enumerate(curves(EXHAUST)):
        blows = np.zeros(N)
        blows[at] = level_to_linear(level_db[at] + size_db + scatter_db[:, k])
        pipe += ring(blows, PIPE[k]) / np.std(ring(even, PIPE[k]))
    dull = lower_part(pipe, 283)
    edge = EDGE_LEFT + (1 - EDGE_LEFT) * .5 ** (t / EDGE_HALF_S)
    pipe = dull + edge * (pipe - dull)
    rasp_db, overtones_db, throb_db = curves(FRINGE)
    pipe += level_to_linear(rasp_db + 2.1 * wobble(6)) * unit(ring(even, (RASP_HZ, RASP_WIDTH_HZ)))
    pipe += level_to_linear(overtones_db) * unit(filtered(even, lambda f: resonances(f, OVERTONES) ** 2))
    powered = t < POPS[0][0]
    throb = level_to_linear(throb_db + 1.6 * wobble(8.1)) * powered * np.sin(2 * np.pi * 2 * cycles)
    return receding(pipe) + wall(pipe) + throb


def scene():
    """All sources at the two ports; the motorcycle is coloured differently at each."""
    cycles = crank()
    bike = exhaust(cycles) + engine(cycles)
    bike = filtered(bike, lambda hz: level_to_linear(np.outer([.5, -.5], along(PORTS, hz))))
    return bike + wind() + rustle() + ticks() + chirps() + distance()


def roll_off(x):
    """The treble ends steeply here."""
    return signal.sosfilt(signal.butter(12, 15700, fs=SR, output="sos"), x)


def record(dry):
    """The left port hears a little late, both lose the deepest bass, and the loudest peaks are softly rounded."""
    def ports(hz):
        half_lag = np.pi * hz * along(LEFT_LAG, hz) / SR  # half the lag on each side, in radians
        return np.exp(np.outer([-1j, 1j], half_lag)) * hz ** 2 / (hz ** 2 + 45 ** 2)

    late = filtered(dry, ports)
    rounded = late / (1 + np.abs(late) ** 8) ** (1 / 8)
    return roll_off(rounded)


dry = scene()
out = record(dry)
to_wav(out)
```